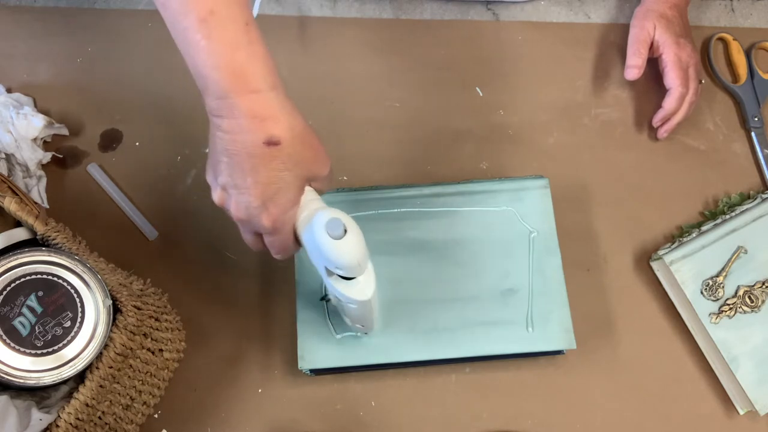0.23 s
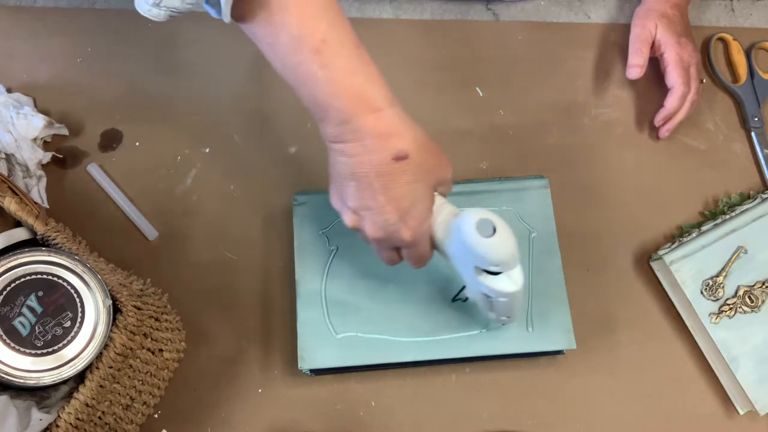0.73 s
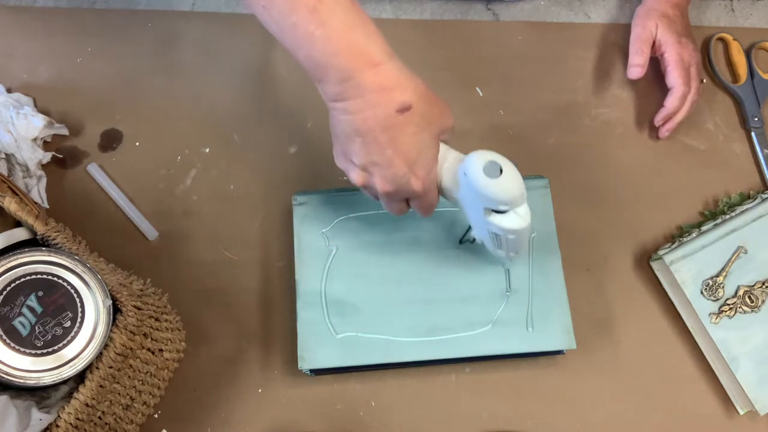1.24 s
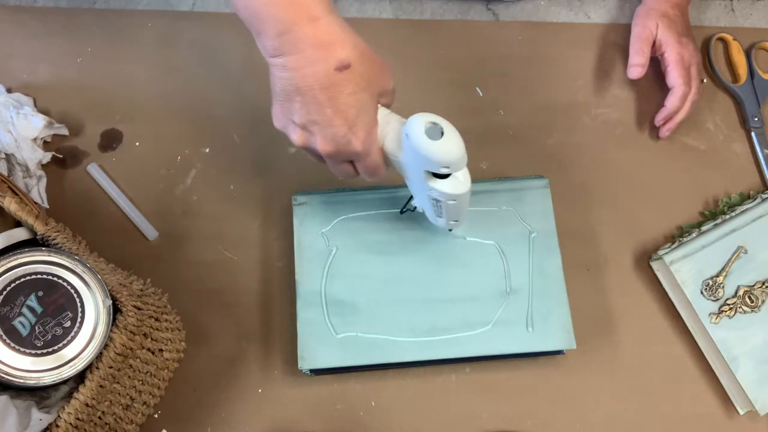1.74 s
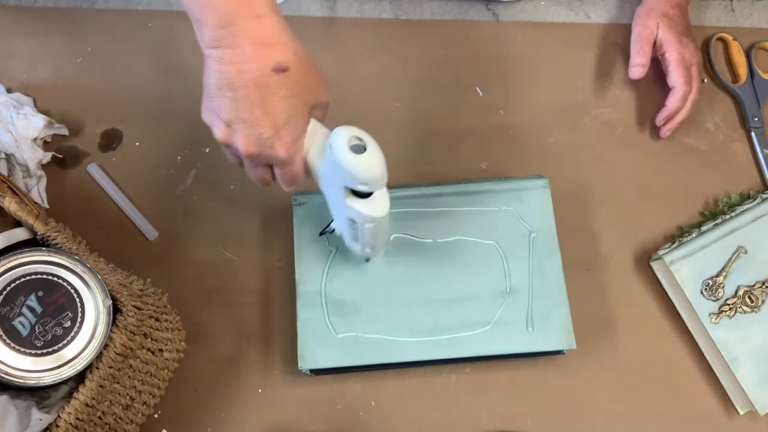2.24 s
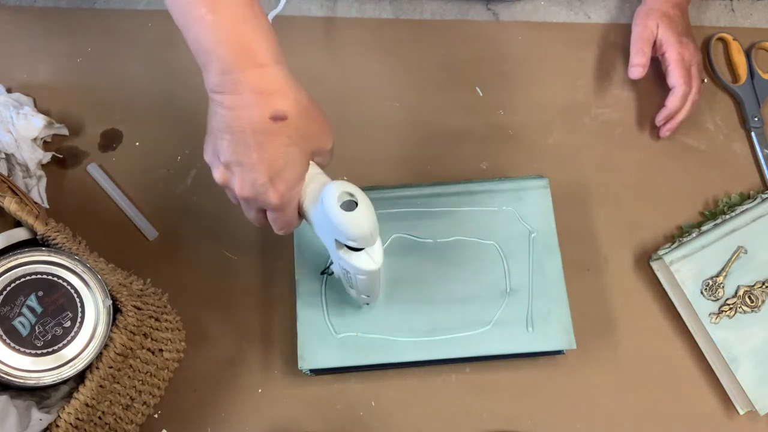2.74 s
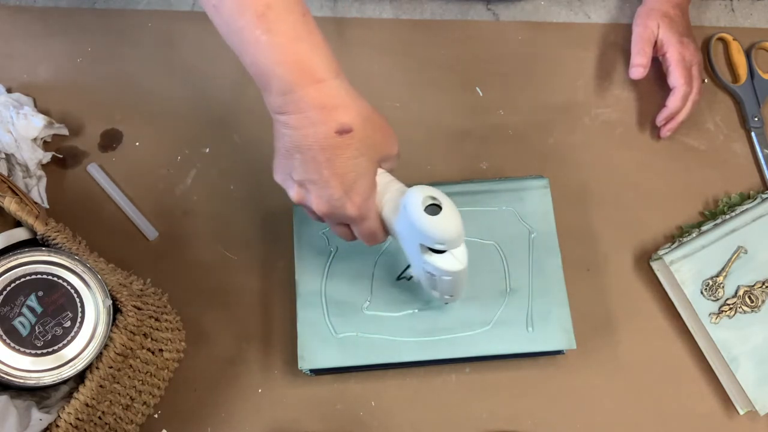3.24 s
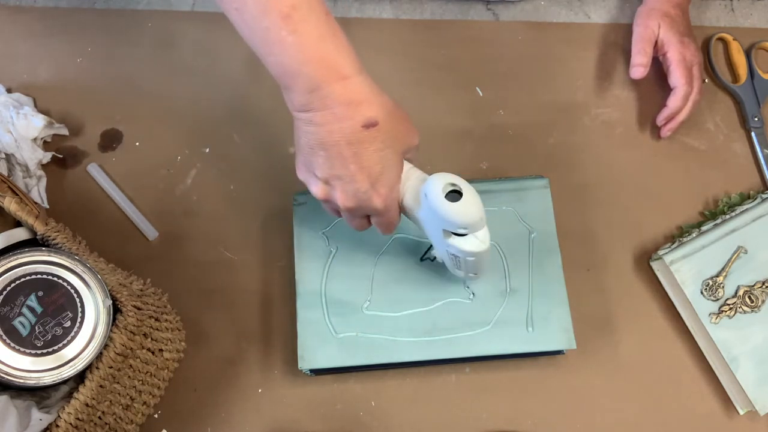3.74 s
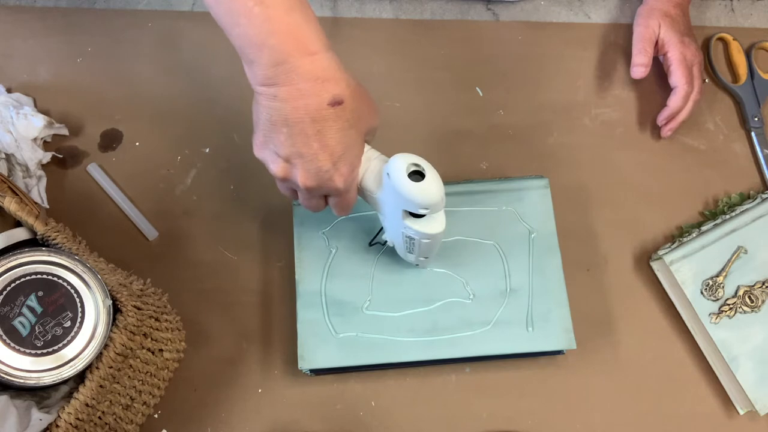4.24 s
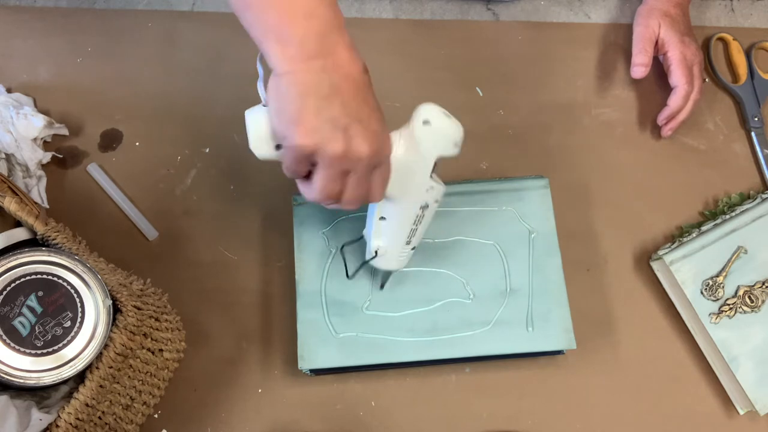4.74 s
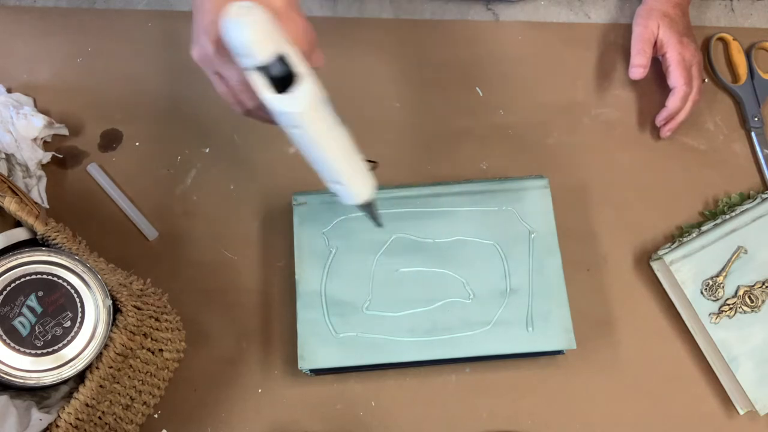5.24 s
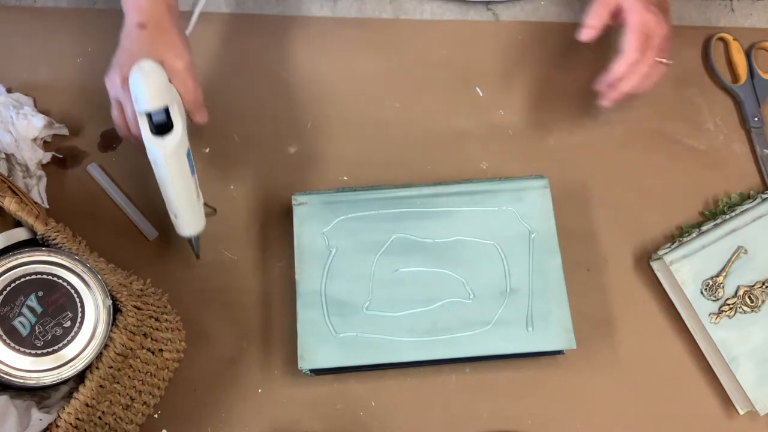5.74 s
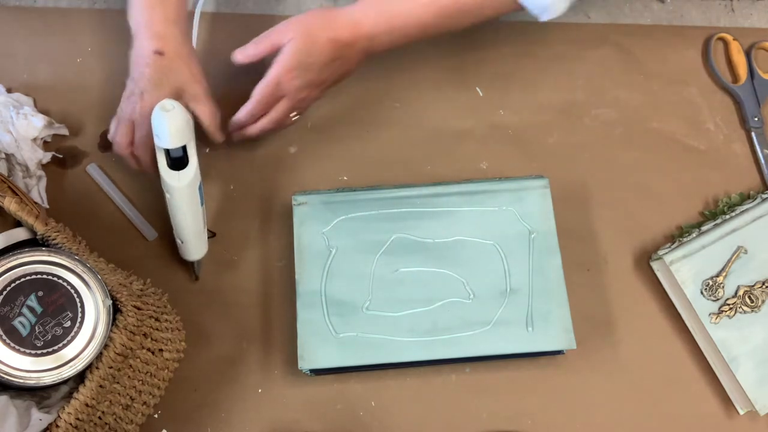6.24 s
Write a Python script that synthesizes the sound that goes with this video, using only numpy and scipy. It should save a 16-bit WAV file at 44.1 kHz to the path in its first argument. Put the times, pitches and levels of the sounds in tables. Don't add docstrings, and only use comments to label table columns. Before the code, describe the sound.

A steady low electrical hum and quiet room air run throughout. Over them, a plastic trigger clicks and ratchets faintly in uneven bursts with pauses between, the feeder teeth skipping and scraping. Near the end comes by far the loudest event: wire stand, barrel and handle hit the tabletop in a rapid clack and thud, rattling briefly. Close stereo microphone, short indoor reverberation.

```python
import sys
import numpy as np
from scipy import signal
from scipy.fft import rfft, irfft, next_fast_len
from scipy.io import wavfile
from scipy.ndimage import map_coordinates

SR = 44100
rng = np.random.default_rng(int(sys.argv[2]) if len(sys.argv) > 2 else 0)


def file_out(sig):
    cols = np.atleast_2d(sig).T
    lim = np.clip(cols, -1, 1)
    pcm = np.round(lim * 32767).astype(np.int16)
    wavfile.write(sys.argv[1], SR, pcm)


def invert_db(x):
    u = np.asarray(x, float) / 20
    return 10 ** u


N = 286209

# pitch_hz, width_hz, level_db
SHELL_MODES = [(1550, 236, 2.5), (2030, 310, 2), (2500, 380, -1.5), (3550, 130, -4), (4700, 500, -25)]
GRIP_MODES = [(806, 104, 0), (1250, 780, -9.5)]
# pitch_hz, level_db (per Hz)
SNAP_COLOUR = [(1800, -28), (3000, 5), (4600, 5), (6300, -5), (8000, -32.5)]
TICK_COLOUR = [(4000, -29), (6000, 1.5), (7400, -5.5), (9500, -5.5), (12000, -15), (14500, -20),
               (15800, -25.5), (16500, -40)]
# start_s, peak_db, pitch_hz
SPRING_PINGS = [(.6975, -51, 5000), (.708, -63, 4500), (0.768, -50, 4350), (.776, -51, 4800),
                (.7815, -66, 3770), (.783, -57, 5000), (.79, -55, 4400), (.9015, -60, 3900),
                (1.4005, -54, 4800), (1.408, -61, 3900), (1.4985, -59, 3700), (1.497, -57, 4700),
                (1.507, -56, 4560), (1.5115, -58, 4750), (1.512, -54, 6650), (1.513, -65, 3780),
                (1.665, -63, 5200), (1.673, -51, 3900), (2.184, -53, 5200), (2.276, -54, 5040),
                (2.283, -59, 4900), (2.322, -50, 4000), (2.329, -48, 3200), (2.49, -59, 4700),
                (2.5005, -55, 4000), (3.109, -53, 5200), (3.1135, -56, 5100), (3.116, -60, 3720),
                (3.126, -58, 5100), (3.128, -58, 3600), (3.289, -49, 3920), (3.66, -61, 4250),
                (3.729, -60, 4100), (3.771, -69, 4200), (3.8103, -48, 4130), (3.815, -54, 3600),
                (3.8925, -55, 7500), (3.892, -57, 4500), (3.975, -50, 7400), (4.211, -55, 7470),
                (4.236, -54, 5600), (4.589, -55, 3900), (4.625, -65, 4040), (4.635, -62, 4350),
                (4.641, -57, 4170), (4.649, -66, 4200), (4.657, -70, 4220), (4.699, -69, 4200),
                (4.747, -58, 6700), (4.762, -56, 3740), (4.78, -65, 3800), (5.573, -57, 4200),
                (5.87, -48, 7000), (3.9752, -62, 12800), (4.2126, -57.5, 12500), (4.2122, -58, 14800),
                (3.804, -60, 6500), (6.095, -56, 5800), (6.339, -59, 4560)]


def trigger():
    s, db, hz, grip_db, snap_db, tick_db = np.transpose(clicks())
    panel = rings(s, db + 3.5, hz, t60=0.02, rise_s=0.00098)
    spring = rings(*np.transpose(SPRING_PINGS), t60=0.007, rise_s=0.00018) * invert_db(10)
    shell = ringing(blows(s, db - 5.5, size=12), SHELL_MODES)
    grip = ringing(blows(s + 0.0012, db + grip_db + 1.5, size=34), GRIP_MODES)
    early = s - 0.0005
    crack = snaps(early, db + snap_db + 1.5, 0.013, SNAP_COLOUR)
    tick = snaps(early, db + tick_db + 7.5, 0.0087, TICK_COLOUR)
    return panel + spring + shell + grip + crack + tick


# start_s, peak_db, snap_db
TOOTH_SKIPS = [(.769, -41, -11), (0.7822, -33, -17), (0.789, -39, -24), (0.794, -44, -21), (.802, -53, -20),
               (1.483, -46, -19), (1.499, -39, -12), (1.514, -35.5, -19), (1.5847, -37, -38),
               (1.6658, -49, -14), (2.265, -43, -19), (2.272, -44, -18), (2.278, -45, -18),
               (2.29, -41, -23), (2.306, -52, -19), (3.146, -41, -24), (3.157, -49, -19), (1.528, -52, -22),
               (1.577, -47, -28), (0.795, -42, -21), (2.283, -39, -17), (2.3, -43, -21),
               (2.3226, -35.5, -17), (2.4877, -48, -7.5), (2.4994, -42, -17), (3.087, -58, -12),
               (3.1143, -38, -11), (3.1301, -38.5, -14), (3.141, -45, -18), (3.1752, -41, -34),
               (3.277, -48, -11), (4.6181, -45, -26), (4.6248, -40, -28), (4.7391, -45, -20),
               (4.7508, -41.5, -18), (4.761, -40, -15), (4.776, -46, -21), (4.79, -46, -25),
               (4.802, -51, -32)]
# start_s, peak_db, pitch_hz, grip_db, snap_db
STOP_KNOCKS = [(0.696, -47, 1510, -11, -2.5), (0.6999, -39, 1550, 8, -11), (0.707, -47, 1850, -3, -11),
               (0.8746, -38, 1540, -1, -21), (.9018, -41, 1580, 0.5, -23), (1.3934, -46, 1430, 4, -25),
               (1.4017, -37, 1506, -1.5, -10), (1.4077, -45.5, 1870, -13, -4), (1.673, -43, 2020, 0, -8.5),
               (2.174, -47.5, 1460, 8.5, -23), (3.0234, -45, 1890, 2, -22), (3.0372, -46.5, 1890, 0, -7.5),
               (3.2896, -45.5, 2380, 2, -15), (3.8088, -41.5, 1550, -2, -5.5), (4.1285, -44, 1960, -3, -38),
               (4.589, -46.5, 1440, 0, -6)]
# start_s, peak_db, pitch_hz, grip_db, tick_db
PAWL_RELEASES = [
    (.3877, -49.5, 2370, -9, -12),
    (2.1835, -46.5, 2140, -1, -12.5),
    (3.7302, -41, 2100, -3, -24),
    (3.8038, -39.5, 2390, -2, -22),
    (3.8554, -53.5, 2020, -12, -22),
    (3.8636, -38, 2050, 1.5, -15.5),
    (3.8935, -39.5, 2020, -0.5, -22),
    (3.9754, -40, 1550, 2, -9.5),
    (4.2122, -38, 2110, 0, -13.5),
    (4.6416, -48, 2000, -24, -11),
]
# start_s, peak_db, pitch_hz, snap_db
HINGE_CREAKS = [(0.1982, -52, 2400, -25), (.327, -50, 1230, -24), (.3255, -50, 2170, -28),
                (3.121, -41, 2180, -27), (4.633, -39, 2040, -24), (4.217, -43, 2080, -26),
                (1.549, -53, 2300, -24), (.36, -58, 2230, -24), (.3745, -49, 2220, -24),
                (0.469, -48, 1510, -21), (.7685, -39.5, 2050, -14), (.774, -41, 2020, -22),
                (.822, -53, 2200, -17), (2.361, -48, 2700, -24), (2.37, -55, 2100, -23),
                (2.405, -53.5, 2500, -24), (0.7836, -43, 2100, -10), (.7915, -42, 2150, -21),
                (0.902, -43, 2470, -14), (1.52, -45, 2010, -19), (1.687, -45, 2440, -20),
                (1.783, -60, 1500, -3), (2.3301, -40, 2340, -25), (2.3345, -41.5, 3130, -23),
                (2.344, -55, 2900, -24), (2.3523, -55, 2500, -22), (2.3885, -50, 2540, -24),
                (2.5068, -42.5, 2340, -24), (3.150, -44.5, 2050, -19), (3.6607, -42.5, 2100, -16.5),
                (3.692, -42.5, 2020, -19), (3.772, -42.5, 2020, -12), (4.4223, -49, 2220, -10),
                (4.589, -41, 2030, -9), (4.627, -36.5, 1960, -21), (4.645, -53, 4220, -22),
                (4.6778, -50, 2050, -25), (4.9839, -57, 2110, -3)]
# start_s, peak_db, pitch_hz, grip_db
FINGER_TAPS = [(0.138, -62, 1470, -18), (.2259, -58.5, 2210, 5), (.5746, -54, 1530, 3),
               (.61, -53.5, 1700, 6), (0.989, -67, 1820, -5), (1.2043, -61, 1370, -2),
               (1.2321, -54.5, 1220, 9.5), (1.9, -59, 1560, 1), (1.955, -59, 1760, 4),
               (1.9985, -56, 1900, -9), (2.2284, -62, 1120, 1), (3.418, -57, 1440, -2),
               (3.6135, -53, 1440, -4), (4.0494, -52, 1490, -12), (5.2065, -60, 1750, -9.5),
               (5.5154, -59, 1970, -4), (5.5594, -58, 1130, 9), (5.6001, -56, 1160, 9.5),
               (5.793, -58, 1440, -10), (6.2221, -57, 870, 9), (6.2301, -56.5, 850, 8),
               (6.2381, -53, 810, 10), (6.245, -61, 850, 8), (1.28, -61, 1510, 3), (.234, -53, 850, 10),
               (2.135, -64, 900, 13)]


def clicks():
    under = -15.5
    tooth_hz, tooth_grip_db = 1545, -16
    partner_hz, partner_db, partner_lag_s = 2150, -9, 0.001555
    bend = 1 + 0.032 * rng.standard_normal((len(TOOTH_SKIPS), 2))
    found = []
    for (s, db, snap), (first, second) in zip(TOOTH_SKIPS, bend):
        found.append((s, db, tooth_hz * first, tooth_grip_db, snap, snap + under))
        found.append((s + partner_lag_s, db + partner_db, partner_hz * second ** 2,
                      tooth_grip_db, snap, snap + under))
    found += [(s, db, hz, grip, snap, snap + under) for s, db, hz, grip, snap in STOP_KNOCKS]
    found += [(s, db, hz, grip, -10, tick) for s, db, hz, grip, tick in PAWL_RELEASES]
    found += [(s, db, hz, -12, snap, snap + under) for s, db, hz, snap in HINGE_CREAKS]
    found += [(s, db, hz, grip, -16, -16 + under) for s, db, hz, grip in FINGER_TAPS]
    return found


def feeder():
    level, bright = drag()
    happens = rng.random(N) < 500 / SR
    slips = happens * rng.standard_normal(N) * invert_db(3 * wobble(60))
    slips = signal.fftconvolve(slips, np.hanning(14))[:N]
    scrape = invert_db(-5.5) * unit(ringing(slips, SHELL_MODES + GRIP_MODES[:1]))
    lumps = unit(invert_db(4.0 * wobble(150)))
    fizz = stereo_noise(N, NEAR_ALIKE, SNAP_COLOUR) + invert_db(-7.0) * stereo_noise(N, NEAR_ALIKE, TICK_COLOUR)
    return level * scrape + bright * lumps * fizz


# peak_s, level_db, swell_db_per_s, brightness_db
STICK_PULLS = [(.388, -61, 122, -16), (0.783, -47, 201, -11.5), (1.511, -44, 803, -11),
               (1.85, -63, 17, -17), (2.29, -49.5, 142, -13.5), (2.65, -63.5, 94, -9.5),
               (3.13, -44.5, 289, -15.5), (3.447, -63.5, 186, -8), (3.902, -57.5, 13, -15.5),
               (4.634, -53.5, 514, -7.5), (4.806, -55.5, 71, -14)]
# start_s, level_db, fade_db_per_s, brightness_db
STICK_JERKS = [(0., -58, 48, -15), (.198, -60.5, 119, -18.5), (.468, -60, 596, -15),
               (.878, -55.5, 96, -12.5), (.97, -74, 46, -5.5), (1.202, -58.5, 128, -15),
               (1.397, -53.5, 522, -17), (1.586, -56, 900, -30), (1.675, -63, 93, -12.5),
               (.80, -63, 152, -10), (2.174, -60, 64, -18), (2.33, -64, 200, -20), (2.502, -43.5, 898, -17),
               (3.03, -56, 353, -12.5), (3.16, -50, 125.5, -21), (3.288, -51, 379, -15),
               (3.978, -39, 1303, -20), (4.0, -67, 47, -21), (4.212, -43.5, 282, -14.5),
               (5.0, -64, 38, -13.5), (5.209, -58.5, 62, -16.5), (5.516, -58, 52, -21),
               (5.96, -54, 66, -9.5), (6.09, -69, 101, -14), (6.2, -63, 30, -11.5)]


def drag():
    longest_s, let_go_db_per_s, jerk_rise_db_per_s = 0.27, 402, 1799.5
    t, level, bright = np.arange(N) / SR, np.zeros(N), np.zeros(N)
    moves = [(s, db, swell, let_go_db_per_s, b) for s, db, swell, b in STICK_PULLS]
    moves += [(s, db, jerk_rise_db_per_s, fade, b) for s, db, fade, b in STICK_JERKS]
    for s, db, rise, fall, bright_db in moves:
        near = slice(max(round((s - longest_s) * SR), 0), round((s + longest_s) * SR))
        gap = t[near] - s
        slope = np.where(gap < 0, -rise, fall)
        ends = np.clip((longest_s - abs(gap)) / 0.09, 0, 1)
        shape = invert_db(db - slope * gap) * ends
        level[near] += shape
        bright[near] += shape * invert_db(bright_db)
    return level, bright


# start_s, table_db, handle_db, barrel_db, snap_db
LANDING_BLOWS = [(5.8703, -72, -69, -74, -51), (5.8734, -28, -51, -32, -37.5), (5.8776, -20, -40, -32, -53),
                 (5.8817, -34.5, -34, -30, -50), (5.887, -32, -44, -38, -56), (5.8899, -51, -41, -19, -48),
                 (5.8908, -26, -37, -8, -27), (5.8917, -23.5, -11, -31, -59), (5.8933, -18, -11, -34, -65),
                 (5.897, -22.5, -44, -23.5, -50), (5.9015, -30, -27, -20.5, -50),
                 (5.908, -28.5, -24.5, -32.5, -56), (5.918, -26, -27, -30.5, -62),
                 (5.922, -29.5, -26, -28, -58), (5.947, -32, -39.5, -40, -60), (6.0, -53, -31, -56, -72),
                 (6.3372, -56, -71, -83, -58)]
# pitch_hz, width_hz, level_db
TABLE_MODES = [(45, 11, -33), (75, 16, -26), (191.6, 8.9, -23.5), (230.5, 14, -10), (237, 33, -13),
               (308.6, 19, -7.5), (347, 15, -13.5), (490, 60, -21.5)]
HANDLE_MODES = [(510, 230, -5.5), (630, 160, -20.5), (1016, 230, 2), (1160, 71, -20)]
BARREL_MODES = [(1700, 330, -2.5), (1904, 380, 1), (2230, 430, 6), (2600, 300, -9)]
TIP_MODES = [(3900, 430, -21), (7300, 660, -29)]
# pitch_hz, level_db (per Hz)
CRACK_COLOUR = [(1500, -15.5), (3500, 6.5), (5000, -4.5), (6300, -12), (7400, 3.5), (9500, -24),
                (12000, -8.5), (14400, -12.5), (15800, -13), (16500, -39)]


def landing():
    s, table_db, handle_db, barrel_db, snap_db = np.transpose(LANDING_BLOWS)
    lean = blows([5.975, 6.003], [-19.5, -17], size=340)
    table = ringing(blows(s, table_db, size=60) + lean, TABLE_MODES)
    handle = ringing(blows(s, handle_db, size=26), HANDLE_MODES)
    barrel = ringing(blows(s, barrel_db, size=24), BARREL_MODES)
    tip = ringing(blows(s, barrel_db, size=5), TIP_MODES)
    crack = snaps(s, snap_db, 0.012, CRACK_COLOUR)
    rattle_db, rattle_t60 = barrel_db - 29, 0.071
    rattle = snaps(s, rattle_db, rattle_t60, SNAP_COLOUR)
    rattle = rattle + snaps(s, rattle_db - 14.5, rattle_t60 * 0.91, TICK_COLOUR)
    return table + handle + barrel + tip + crack + rattle


# pitch_hz, likeness (0-1)
ROOM_ALIKE = [(40, 0.6), (300, 1), (700, 0), (1300, 0.8), (2200, .55), (5000, 0.2), (9500, 1), (12500, 0.9),
              (14500, .8)]
# pitch_hz, level_db
ROOM_COLOUR = [(100, -4), (400, -1), (1000, -0.1), (2000, -1), (2900, 2), (3800, 2), (5000, 0.5), (7400, 0),
               (12000, -4), (16000, -5)]
# pitch_hz, t60_s
ROOM_T60 = [(100, 0.28), (500, 0.51), (2000, 0.38), (6000, 0.31), (14000, 0.25)]


def room(x):
    out, hop = np.zeros((2, N + 2 * SR)), SR // 4
    delay = 130
    for a in range(0, N, hop):
        noise = stereo_noise(SR * 3 // 5, ROOM_ALIKE, ROOM_COLOUR)
        hz, t, z = signal.stft(noise, SR, nperseg=256)
        fade = invert_db(-60 * t / along(ROOM_T60, hz)[:, None])
        tail = signal.istft(z * fade, SR, nperseg=256)[1]
        tail *= 1 - np.exp(-np.arange(tail.shape[1]) / SR / 0.00028)
        tail = tail / np.linalg.norm(tail[0])
        wet = signal.fftconvolve(x[None, a:a + hop], tail, axes=1)
        out[:, a + delay:a + delay + wet.shape[1]] += wet
    return out[:, :N]


# pitch_hz, level_db (rms), opposes_first_line_s
HUM_LINES = [(119.83, -62, 0), (121.67, -73, .22), (123.53, -77, .16), (117.98, -81, .11),
             (239.67, -51.5, 0), (359.5, -70.5, 0)]


def hum():
    t, first_hz = np.arange(N) / SR, HUM_LINES[0][0]
    out = np.zeros(N)
    for hz, db, s in HUM_LINES:
        level = invert_db(db + 4 + 0.73 * wobble(12.0))
        turns = hz * (t - s) + first_hz * s + 0.5
        phase = 2 * np.pi * turns + 0.12 * wobble(4.6)
        out += level * np.sin(phase - np.pi * (hz == first_hz))
    return out


# pitch_hz, level_db (per Hz)
AIR_COLOUR = [(30, -31), (42, -11), (90, -6.5), (160, 1.5), (300, -2.5), (500, -3.5), (800, -12),
              (1500, -14), (2400, -19.5), (4100, -25.5), (6300, -41), (8000, -47), (13700, -47),
              (14800, -64)]
# pitch_hz, likeness (0-1)
AIR_ALIKE = [(100, 1), (400, 0.59), (1000, 0), (2400, 0.4), (4100, 0.6), (5200, 1), (6300, 0.02), (9500, 1),
             (12000, 0.4), (14500, .85)]


def air():
    swell_db = 0.4 * wobble(2) + 0.7 * wobble(9)
    return invert_db(-55 + swell_db) * stereo_noise(N, AIR_ALIKE, AIR_COLOUR)


def rings(times, db, hz, t60, rise_s):
    out, t = np.zeros(N + 2000), np.arange(2000) / SR
    fade = invert_db(-60 * t / t60) * (1 - np.exp(-t / rise_s))
    for start, level, pitch_hz in zip(times, db, hz):
        out[round(start * SR):][:2000] += invert_db(level) * fade * np.sin(2 * np.pi * pitch_hz * t)
    return out[:N]


def blows(times, db, size):
    marks = np.zeros(N)
    np.add.at(marks, np.round(np.asarray(times) * SR).astype(int), -invert_db(db))
    return signal.fftconvolve(marks, np.hanning(size) * 2 / size)[:N]


def ringing(x, modes):
    def response(f):
        return sum(invert_db(db) * SR / np.pi * 1j * f / (c * c - f * f + 1j * f * w) / 2 for c, w, db in modes)
    return filtered(x, response)


# pitch_hz, likeness (0-1)
NEAR_ALIKE = [(2000, 0.8), (3200, 0.2), (5200, 0.09), (7400, 0.7), (10000, 0.99), (12500, .75),
              (14500, .94)]


def snaps(times, db, t60, colour):
    marks = np.zeros(N)
    marks[np.round(np.asarray(times) * SR).astype(int)] = invert_db(db)
    fade = invert_db(-60 * np.arange(2000) / SR / t60)
    return signal.fftconvolve(marks, fade)[:N] * stereo_noise(N, NEAR_ALIKE, colour)


def stereo_noise(n, alike, colour):
    def mid_and_side(hz):
        turn = np.arccos(np.clip(along(alike, hz), -1, 1)) / 2
        return invert_db(along(colour, hz)) * [np.cos(turn), np.sin(turn)]
    mid, side = filtered(rng.standard_normal((2, n)), mid_and_side)
    return unit(np.array([mid + side, mid - side]))


def filtered(x, response):
    n = x.shape[-1]
    m = next_fast_len(n + SR // 2)
    return irfft(rfft(x, m) * response(np.fft.rfftfreq(m, 1 / SR)), m)[..., :n]


def wobble(rate):
    return map_coordinates(rng.standard_normal(int(N * rate / SR) + 4), [np.arange(N) * rate / SR])


def along(points, hz):
    f, v = np.transpose(points)
    return np.interp(np.log(hz + 1), np.log(f + 1), v)


def unit(x):
    return x / np.sqrt(np.mean(x ** 2) + 1e-20)


def scene():
    hand, drop = trigger() + feeder(), landing()
    wet = room(invert_db(-6.5) * hand[0] + invert_db(-5.5) * drop[0])
    return hand + drop + wet + hum() + air()


def low_pass(x):
    return signal.sosfilt(signal.butter(12, 16510, fs=SR, output="sos"), x)


# pitch_hz, lag_rad
PORT_LAG = [(50, 0), (250, .3), (900, .75), (1800, 1), (3200, 2.4), (5200, 2.9), (7400, 1.9), (8400, 2.6),
            (9400, 3.1), (10600, 3.25), (11800, 4.1), (13100, 5.4), (14400, 6.2)]
# pitch_hz, left_minus_right_db
PORT_TILT = [(60, 0.7), (300, 3), (700, 0), (1500, 0.2)]


def record(dry):
    half = np.array([[0.5], [-0.5]])

    def port(hz):
        tilt = invert_db(half * along(PORT_TILT, hz))
        lag = np.exp(-1j * half * along(PORT_LAG, hz))
        return tilt * lag * np.clip((16600 - hz) / 600, 0, 1)
    mix = filtered(dry, port)
    return low_pass(mix)


dry = scene()
out = record(dry)
file_out(out)
```